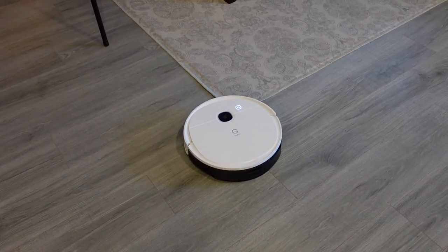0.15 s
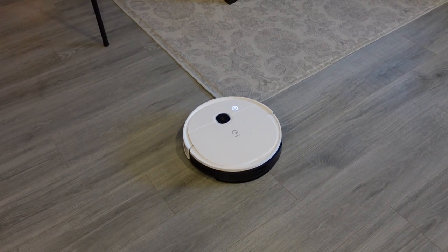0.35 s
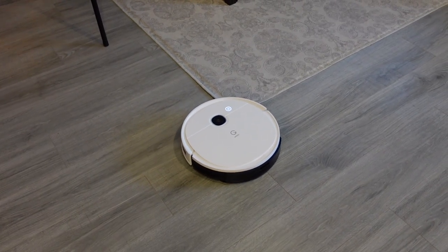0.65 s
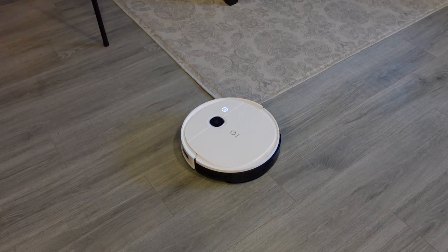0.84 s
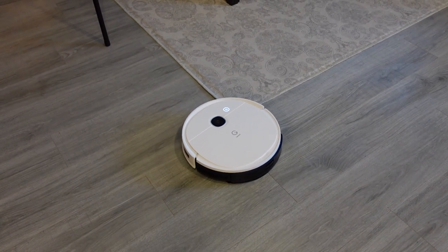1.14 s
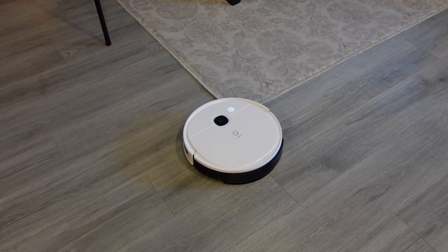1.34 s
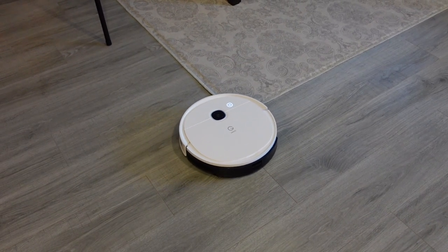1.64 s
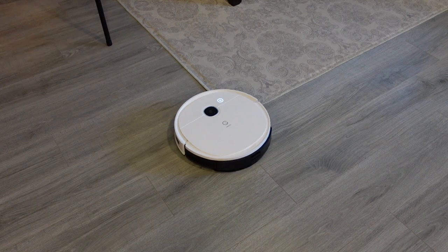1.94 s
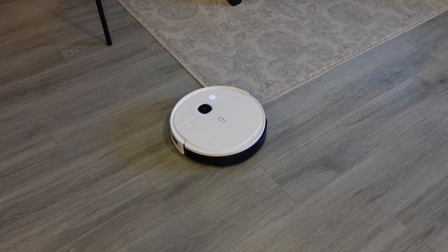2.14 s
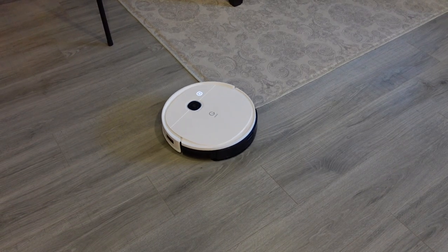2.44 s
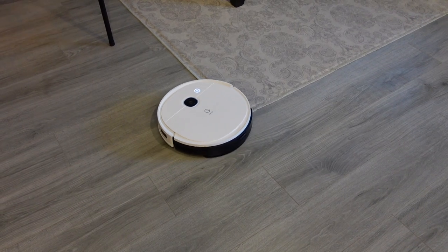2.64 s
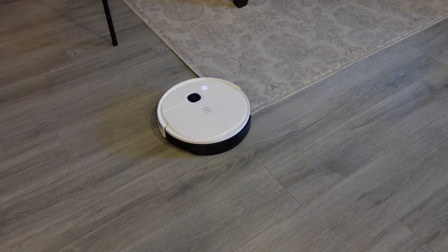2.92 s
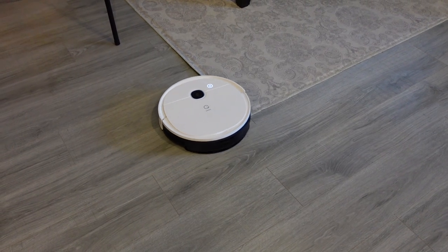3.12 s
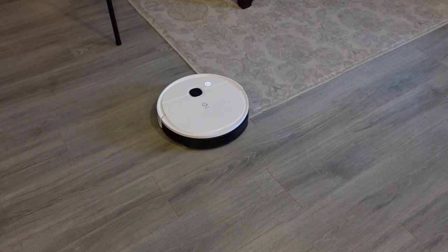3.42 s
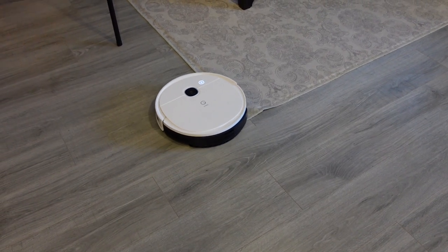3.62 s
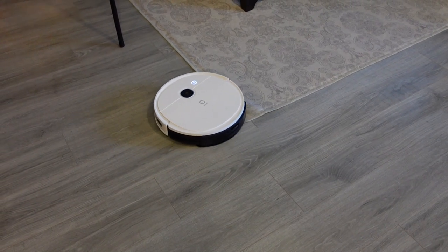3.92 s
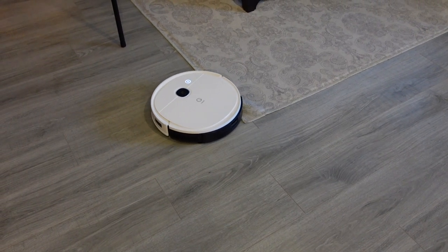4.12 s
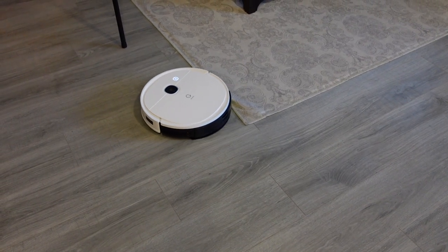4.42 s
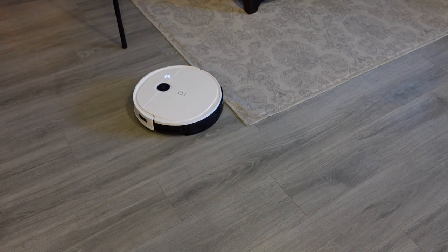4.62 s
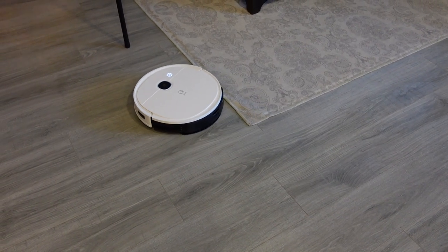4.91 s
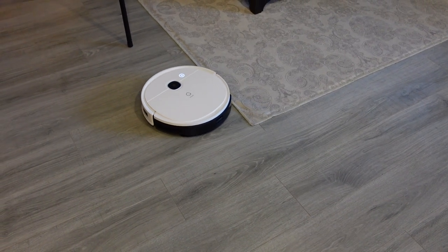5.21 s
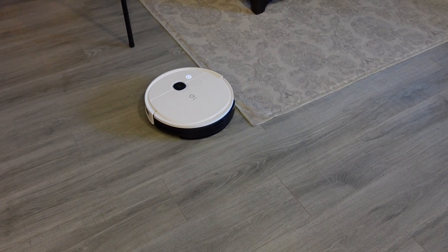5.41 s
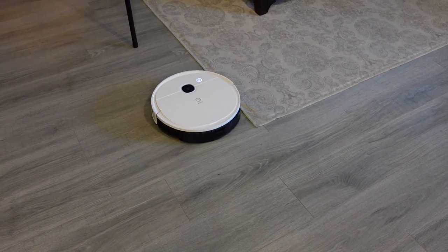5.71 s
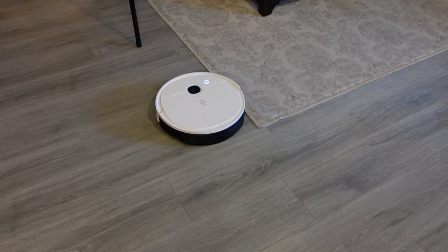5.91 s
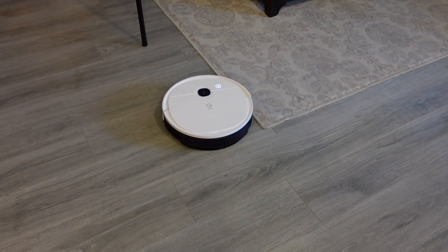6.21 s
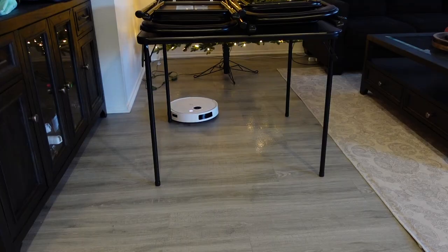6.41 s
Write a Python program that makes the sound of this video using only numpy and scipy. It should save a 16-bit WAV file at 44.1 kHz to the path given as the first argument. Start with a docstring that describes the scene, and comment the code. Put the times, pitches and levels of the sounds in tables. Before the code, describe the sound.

Close, constant robot vacuum noise: airy fan hiss, fast fluttering brush scratch, buzzing gears and scattered clicks, turning slightly duller at the very end.

```python
"""A living room with a hard floor: a robot vacuum works a few steps from a phone. Its fan is shaped noise.
Its brush turns about eight times a second; each turn two bristle rows scratch the boards (noise in swells),
thump the body and load a rough gear whine. Wheels rumble and hum, and jolt twice over board seams;
grit ticks in the shell. At the very end the machine is heard from farther away and its hiss dulls."""
import sys
import numpy as np
from scipy import signal
from scipy.fft import rfft, irfft, next_fast_len
from scipy.io import wavfile
from scipy.ndimage import uniform_filter1d, map_coordinates

SR = 44100
rng = np.random.default_rng(int(sys.argv[2]) if len(sys.argv) > 2 else 0)


def pcm_store(signal):
    """Save signal as 16-bit PCM."""
    levels = np.round(np.clip(np.atleast_2d(signal), -1, 1) * 32767)
    wavfile.write(sys.argv[1], SR, levels.astype(np.int16).T)


N = 288855  # length in samples

# the brush runs faster in the middle, where it bites less:
# (t/s, turns done, gear swell of row one/dB, of row two/dB, rasp swell of row one/dB, of row two/dB,
#  thump level/dB)
BRUSH_TURNS = [(-.045, -1, 6, 5.5, 1.5, 2, -37), (.453, 3, 7, 2, 2.5, 2.5, -35),
               (.944, 7, 8.5, 1, 2.5, 2, -35), (1.185, 9, 9, 9, 1, 3.5, -40),
               (1.55, 12, 9.5, 6, 1.5, 2, -37.5), (1.79, 14, 12, -11, 1, 0.5, -46),
               (2.03, 16, 10, -2, 2, 0.5, -35), (2.27, 18, 5, -8, -1.5, -1, -48),
               (2.855, 23, 11, 10, 2, 2, -52), (3.33, 27, 4, -4, -3, 0.5, -50),
               (3.56, 29, 6, -4, 1.5, -1, -65), (4.135, 34, 7, -5, 2, -1, -54),
               (4.718, 39, 10.5, 5, 3.5, 1, -48), (4.96, 41, 9, 6.5, 0.5, 3.5, -49),
               (5.575, 46, 9.5, 9, 2, 3.5, -56), (6.191, 51, 9, 9.5, 2.5, 4.5, -53),
               (6.68, 55, 13, 6, -2, 0.5, -52)]


def amp(db):
    """Decibels to a plain factor."""
    return 10 ** (np.asarray(db) / 20)


def unit(x):
    """Scaled to rms 1."""
    return x / np.sqrt(np.mean(x ** 2) + 1e-20)


def along(points, hz):
    """Read (f/Hz, value) points at any frequency, on a log frequency axis."""
    f, value = np.transpose(points)
    return np.interp(np.log(hz + 1), np.log(f + 1), value)


def curves(rows):
    """One value per sample for each column after the time."""
    s, *columns = np.transpose(rows)
    return [np.interp(np.arange(N) / SR, s, column) for column in columns]


def wobble(rate):
    """A smooth random curve through `rate` random points a second."""
    points = rng.standard_normal(int(N * rate / SR) + 4)
    return map_coordinates(points, [np.arange(N) * rate / SR])


def filtered(x, response):
    """x with each frequency multiplied by response(frequency)."""
    m = next_fast_len(N + SR // 2)  # spare room so that the end does not wrap to the start
    return irfft(rfft(x, m) * response(np.fft.rfftfreq(m, 1 / SR)), m)[..., :N]


def boosted(x, band, boost_db):
    """x with one band raised or lowered over time."""
    centre, width = band
    in_band = filtered(x, lambda f: np.exp(-2 * ((f - centre) / width) ** 2))
    return x + (amp(boost_db) - 1) * in_band


def patches(shape, across_pitch, across_time):
    """Random values of rms 1, smoothed over neighbouring pitches and moments."""
    field = uniform_filter1d(rng.standard_normal(shape), size=across_pitch, axis=0)
    return unit(uniform_filter1d(field, size=across_time, axis=1))


def rush(gain, patchy_db, spiky_db):
    """Noise of rms 1 with patches of random gain in time and pitch, and fast spikes."""
    spiky = rng.standard_normal(N) * amp(spiky_db * wobble(900))
    z = signal.stft(spiky, nperseg=512)[2]
    z = z * amp(patchy_db * patches(z.shape, 8, 5))
    return unit(filtered(signal.istft(z, nperseg=512)[1][:N], gain))


def speed():
    """Brush turns a second, smoothed over half a second by the motor's inertia."""
    turns = curves(BRUSH_TURNS)[0]
    return uniform_filter1d(np.gradient(turns) * SR, size=SR // 2)


def fan(level_db, bright_db, lift_db):
    """Suction hiss with a broad whistle; its top end follows the brightness."""
    # colour of the moving air: (f/Hz, relative level per Hz/dB)
    air = [(3820, -41), (6500, -3), (7440, -4.5), (9540, -3), (10100, 3.5), (10500, 5.5), (11500, -8),
           (12200, -6.5), (13700, -14), (15100, -9), (15600, -15)]
    hiss = rush(lambda f: amp(along(air, f)), patchy_db=1.0, spiky_db=2.3)
    top = filtered(hiss, lambda f: 1 / (1 + (11400 / (f + 1)) ** 16))
    gust_db = 0.22 * lift_db + 0.13 * wobble(12) + 0.48 * wobble(35)
    top_gain = amp(bright_db + 0.52 * gust_db)
    return amp(level_db + gust_db) * (hiss + (top_gain - 1) * top)


def sweeps():
    """When each bristle row lands, its gear and rasp swells, and its thump on the body."""
    row_two = 0.45  # the second row's place in the turn
    row_two_thump_db = -9.5  # the second row strikes more softly
    uneven_s, uneven = 0.0036, 0.092  # scatter of each sweep in time, and in size as a share
    thump_hz = 382.8  # the body's ring, before a small scatter
    s, turns, gear_one, gear_two, rasp_one, rasp_two, thump_db = np.transpose(BRUSH_TURNS)
    whole = np.arange(np.ceil(turns[0]), turns[-1])
    one = np.interp(whole, turns, s)
    two = np.interp(whole + row_two, turns, s)

    def both_rows(first, second):
        return np.r_[np.interp(one, s, first), np.interp(two, s, second)]

    gear = both_rows(gear_one, gear_two)
    rasp = both_rows(rasp_one, rasp_two)
    strike_db = both_rows(thump_db, thump_db + row_two_thump_db)
    chance = rng.standard_normal((len(gear), 3))
    landings = np.r_[one, two] + uneven_s * chance[:, 0]
    thumps = []
    for at, db, (size, tone) in zip(landings, strike_db, rng.standard_normal((len(gear), 2))):
        if 0 < at < N / SR:
            thumps.append((at, db + 1.3 * size, thump_hz * (1 + 0.02 * tone)))
    return landings, gear * (1 + uneven * chance[:, 1]), rasp * (1 + uneven * chance[:, 2]), thumps


def swell(landings, lift_db, rise, fall):
    """Lift in dB: one hump per sweep, with its own rise and fall in seconds."""
    t = np.arange(N)[::64] / SR  # a coarse clock is enough for slow humps
    late = t[:, None] - landings
    hump = np.exp(-.5 * (late / np.where(late < 0, rise, fall)) ** 2)
    return np.interp(np.arange(N) / SR, t, hump @ lift_db)


def brush(level_db, lift_db):
    """Bristles scratch the boards: noise that sounds through the resonant shell."""
    # colour of the scratching: (f/Hz, relative level per Hz/dB)
    rasp = [(260, -49), (450, -18), (672, -13.5), (734, -9), (781, -10), (1660, 0), (1950, -2), (2880, -4),
            (6180, -13.5), (7460, -26.5), (9000, -27.5), (11700, -40), (19800, -120)]
    # ringing of the plastic body: (f/Hz, width/Hz, level over the rasp/dB)
    shell = [(688.4, 28, 3.5), (983, 310, -4.5), (1720, 27, -36), (2100, 150, -13), (2826, 78, -6.5),
             (3320, 250, -24)]

    def response(f):
        rings = sum(amp(db) * w * w / (w * w + 4 * (f - c) ** 2) for c, w, db in shell)
        return amp(along(rasp, f)) * (1 + rings)

    return amp(level_db + lift_db) * rush(response, patchy_db=1.0, spiky_db=1.22)


def dust(level_db, lift_db, rate, fall):
    """Countless small grains and bristle tips: sudden ticks that die away, denser in each sweep."""
    when, size = rng.random((2, N))
    hits = (when < rate / SR * amp(1.5 * lift_db)) * amp(4 * size)
    fade = np.exp(-np.arange(SR // 40) / SR / fall)
    bursts = signal.fftconvolve(hits, fade)[:N] * rng.standard_normal(N)
    # (f/Hz, relative level/dB)
    colour = [(900, -33), (2500, -7.0), (6000, -7.0), (8000, -20), (11500, -21), (15000, -22)]
    return amp(level_db - 16) * unit(filtered(bursts, lambda f: amp(along(colour, f))))


def gears(growl_db, whine_db, gear_lift, rasp_lift):
    """Worn teeth: the housing growls with every load; the mesh partials flutter into fuzzy lines."""
    mesh_hz, growl_width_hz = 1288.4, 170  # tooth contacts a second; breadth of the growl
    # where the gear housing rings as the load shifts: (t/s, f/Hz)
    growl_hz = [(0.0, 1320), (1.14, 1360), (1.27, 1290), (1.34, 1350), (2.26, 1320), (3.37, 1370),
                (3.44, 1330), (4.72, 1360), (4.83, 1310), (5.39, 1360), (5.57, 1320), (6.5, 1330)]
    # shares of the rough and the pitched part of the growl: (rough, pitched)
    growl_mix = np.array([.6, .85])
    # upper tooth contacts: (multiple of the mesh pitch, level/dB, flutter rate/Hz)
    mesh = [(3, 1, 380), (4, -0.5, 340), (4, -1, 850), (5, -6.5, 500)]
    centre_hz, = curves(growl_hz)
    centre_turn = 2 * np.pi * np.cumsum(centre_hz) / SR
    rough = wobble(1.3 * growl_width_hz) * np.sin(centre_turn + 3 * wobble(20))
    wandering_hz = centre_hz + .3 * growl_width_hz * wobble(120)
    pitched = np.sin(2 * np.pi * np.cumsum(wandering_hz) / SR)
    growl = amp(growl_db + gear_lift) * (growl_mix @ [rough, pitched])

    turn = 2 * np.pi * np.cumsum(mesh_hz * (1 + .003 * wobble(3) + .008 * wobble(14))) / SR
    second = amp(growl_db - 4.0 + 0.5 * gear_lift) * (0.7 + wobble(110)) * np.sin(2 * turn)
    whine = sum(amp(db + 0.72 * wobble(7)) * wobble(hz) * np.sin(k * turn) for k, db, hz in mesh)
    return growl + second + amp(whine_db + 0.2 * gear_lift + 1.2 * rasp_lift) * whine


def wheels(rumble_db, lift_db):
    """Rolling rumble made of low noise, with narrow wavering drones."""
    # colour of the rolling: (f/Hz, relative level per Hz/dB)
    rumble = [(15, -83), (25, -54), (130, -30.5), (216, -15), (243, -15), (285, -3.5), (357, 2),
              (492, -4.5), (600, -7.5), (780, -6), (1320, -120)]
    # wavering low tones: (f/Hz, wavering rate/Hz, level over the rumble/dB)
    low_tones = [(298, 20, -5.5), (392, 12, -6.5)]
    t = np.arange(N) / SR
    drones = sum(amp(db) * wobble(w) * np.sin(2 * np.pi * c * t) for c, w, db in low_tones)
    roll = rush(lambda f: amp(along(rumble, f)), patchy_db=1.1, spiky_db=0)
    return amp(rumble_db + 0.076 * lift_db) * (roll + drones)


def hum():
    """The wheel motor's clean tone: one sine of drifting pitch and level."""
    # the wheel motor: (t/s, f/Hz, level/dB)
    motor = [(0, 347, -61), (.4, 349, -54), (1.05, 346.7, -56), (1.3, 350.5, -49.5), (1.75, 347.6, -67),
             (2.05, 347, -49), (2.55, 349.7, -60), (2.66, 351, -48), (3.05, 350, -48.5), (3.38, 348, -50),
             (3.45, 382, -50), (3.52, 385, -72), (4.9, 351.3, -63.5), (5.03, 350, -46), (5.22, 350, -59.5),
             (5.36, 350.5, -49), (5.5, 350.5, -56.5), (5.75, 352, -45), (6.03, 351.5, -55.5),
             (6.15, 352, -46.5), (6.42, 348, -57)]
    hz, hum_db = curves(motor)
    return amp(hum_db + 0.9 * wobble(15)) * np.sin(2 * np.pi * np.cumsum(hz) / SR)


def jolts(knocks, rise, fall):
    """Low knocks, (t/s, level/dB, f/Hz): a thud through the whole body, then a short ring."""
    out, t = np.zeros(N + SR), np.arange(SR // 5) / SR
    for s, db, hz in knocks:
        ring = np.sin(2 * np.pi * hz * t)
        ring += 0.5 * np.sin(2 * np.pi * .91 * hz * t)
        ring += 0.34 * np.sin(2 * np.pi * (.77 * hz * t + rng.random()))
        ring *= (1 - np.exp(-t / rise)) * np.exp(-t / fall)
        thud = 0.9 * np.sin(2 * np.pi * 0.78 * hz * t) * np.exp(-t / 0.0032)
        out[round(s * SR):][:len(t)] += amp(db) * (ring + thud)
    return filtered(out[:N], lambda f: 1 / (1 + (215 / (f + 1)) ** 8))


def echoes(x, ripple_db):
    """Floor and wall echoes ripple the spectrum finely; the ripples shift as the machine moves."""
    z = signal.stft(x, nperseg=2048)[2]
    z = z * amp(ripple_db * patches(z.shape, 2, 12))
    return signal.istft(z, nperseg=2048)[1][:N]


def spread(x, t60):
    """A faint stereo spread: a short fading noise tail, to be added opposite in left and right."""
    # level of the spread against the centre: (f/Hz, level/dB)
    width = [(60, -18), (110, -19), (200, -18), (380, -23.5), (700, -16), (1290, -32.5), (2380, -23),
             (4400, -41), (8120, -66), (15000, -45)]
    t = np.arange(SR // 4) / SR
    tail = rng.standard_normal(len(t)) * amp(-60 * t / t60)
    smeared = signal.fftconvolve(x, tail / np.linalg.norm(tail))[:N]
    return filtered(smeared, lambda f: amp(along(width, f)))


def grit():
    """Each grain snaps at its own pitch; the longer ones add more upper ring and a short crack."""
    # grit striking the shell: (t/s, strike level/dB, f/Hz, time to fall by 60 dB/s, left over right/dB)
    grains = [(.2039, -18, 2400, 0.011, 1), (0.319, -15, 2600, .008, 1), (.6873, -15.5, 2090, 0.0094, 2),
              (1.242, -9, 2820, 0.0068, 0.5), (1.364, -17, 3900, 0.0067, 0.5),
              (1.624, -22, 3000, 0.0066, 0), (2.432, -21, 4500, .002, 0), (2.7957, -12.5, 1750, .013, 0),
              (3.3710, -13.5, 1750, .018, 0), (3.54, -20, 3300, .008, 1), (3.857, -15, 3500, 0.0034, 1),
              (4.6992, -16, 2000, 0.0091, 1), (5.1387, -20.5, 3500, 0.0044, 0),
              (5.5069, -22, 2100, .008, 3), (5.6301, -17, 2800, 0.0055, -1), (5.9325, 2.5, 5400, .001, -1),
              (5.9476, 1, 4700, .0012, -9), (6.2394, -15, 1710, 0.0087, 0), (6.322, -13, 2620, 0.0082, -3),
              (6.42, -13, 2480, 0.007, 1)]
    upper_ring = 1.87  # second ring of a grain over its pitch
    out, t = np.zeros((2, N + SR)), np.arange(SR // 20) / SR
    for s, db, hz, t60, pan_db in grains:
        body = np.clip(t60 / .025, 0, .8)
        crack = 3 * uniform_filter1d(rng.standard_normal(len(t)), size=6) * amp(-30 * t / t60)
        upper = np.sin(2 * np.pi * upper_ring * hz * t)
        tick = np.sin(2 * np.pi * hz * t) + body * (upper + crack)
        tick *= amp(db - 60 * t / t60) * (1 - np.exp(-t / (.00012 + t60 / 40)))
        sides = amp([[pan_db / 2], [-pan_db / 2]])
        out[:, round(s * SR):][:, :len(t)] += sides * tick
    return filtered(out[:, :N], lambda f: 1 / (1 + (f / 9500) ** 6) / (1 + (1100 / (f + 1)) ** 4))


def farther(x):
    """From a greater distance the treble and the rumble fade."""
    farther_s, change_s = 6.398, 0.0049  # when it begins and how long the change takes
    # (f/Hz, level/dB)
    loss = [(300, -7.0), (1500, -0.5), (8000, -1.2), (10000, -5.5), (13000, -7)]
    dull = filtered(x, lambda f: amp(along(loss, f)))
    away = np.clip((np.arange(N) / SR - farther_s) / change_s, 0, 1)
    return x + away * (dull - x)


def scene():
    """All parts of the machine add up near the centre, slightly right, with grit on top."""
    # the machine: (t/s, gear growl/dB, upper whine/dB, brush rasp/dB, hiss brightness/dB, rumble/dB)
    machine = [(0, -36.5, -44, -30, 0, -49), (.85, -36.5, -41, -31, 0.5, -55.5),
               (1.5, -37.5, -40.5, -31, -2, -52), (2.08, -35, -43, -30.5, 0, -52),
               (2.25, -42.5, -46.5, -31.5, 1, -51.5), (2.9, -40.5, -45, -31.5, -2, -52.5),
               (3.4, -42, -51, -30.5, -1.5, -51.5), (4.0, -40.5, -48, -31, -2, -53),
               (4.45, -34, -48, -31, 2, -53.5), (4.8, -39, -46, -31, 3, -55.5),
               (5.6, -37, -42.5, -31, -1.5, -51.5), (6.1, -37.5, -49, -30.5, 1, -52.5),
               (6.39, -41.5, -52, -31, -3, -51)]
    # the tone shifts as the machine turns: (t/s, boost of the rasp/dB, boost of the hiss/dB)
    tone_shift = [(0, 1, 4), (.45, 1, -6), (.9, 2, 4), (1.8, 1.5, -3), (2.6, 0, 4), (2.9, -1, -2),
                  (3.3, 2, 1), (3.65, 0, -4), (4.2, -2, 2), (4.9, 0.5, -1), (5.5, 0, -2.5), (6, 0, 0),
                  (6.35, -1, 5)]
    presence, sheen = (2700, 930), (11700, 1000)  # bands shifted in rasp and hiss: (f/Hz, width/Hz)
    # wheels jolting over board seams: (t/s, level/dB, f/Hz)
    seams = [(2.94, -44, 445), (6.165, -37, 500)]
    gear_lag_s, rasp_lag_s = 0.022, 0.015  # delay of the swells after a row lands

    growl_db, whine_db, rasp_db, bright_db, rumble_db = curves(machine)
    presence_db, sheen_db = curves(tone_shift)
    landings, gear_db, scratch_db, thumps = sweeps()
    gear_lift = swell(landings + gear_lag_s, gear_db, rise=0.0067, fall=0.01)
    rasp_lift = swell(landings + rasp_lag_s, scratch_db, rise=0.004, fall=0.014)

    air_db = -46 + 2 * (speed() - 8)  # 2 dB more for each turn a second above eight
    hiss = boosted(fan(air_db, bright_db, rasp_lift), sheen, sheen_db)
    rasp = boosted(brush(rasp_db, rasp_lift), presence, presence_db)
    ticks = dust(rasp_db, rasp_lift, rate=70, fall=0.0022)
    teeth = gears(growl_db, whine_db, gear_lift, rasp_lift)
    rolling = wheels(rumble_db, gear_lift)
    knocks = jolts(thumps, rise=0.003, fall=0.024) + jolts(seams, rise=0.017, fall=0.059)

    rippled = echoes(rolling + rasp + hiss, ripple_db=1.5)
    robot = farther(rippled + teeth + knocks + ticks + hum())
    side = spread(robot, t60=0.14)
    lean = filtered(robot, lambda f: 0.022 / (1 + (f / 3500) ** 4))  # the lean shows below the treble
    return robot + np.array([side - lean, lean - side]) + grit()


def record(dry):
    """The phone cuts the bass and keeps nothing above its band limit."""
    top_hz, bass_hz = 15760, 90
    return filtered(dry, lambda hz: (hz < top_hz) / (1 + (bass_hz / (hz + 1)) ** 4))


dry = scene()
out = record(dry)
pcm_store(out)
```